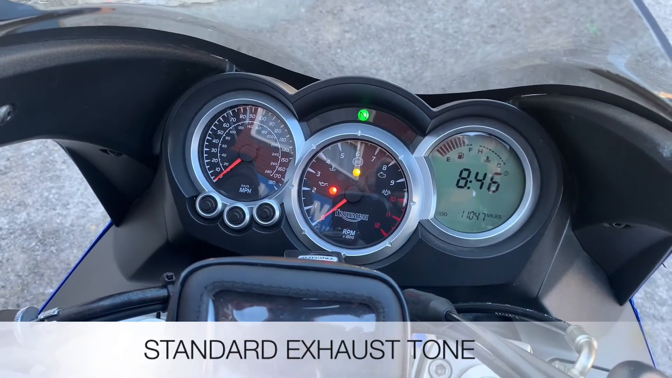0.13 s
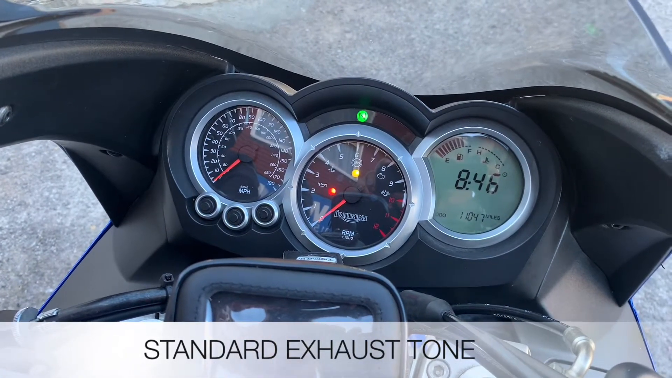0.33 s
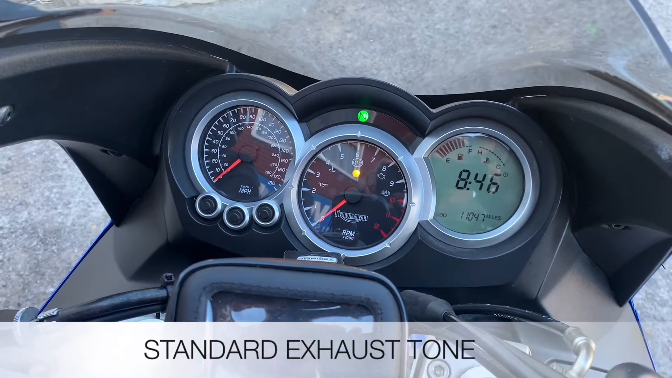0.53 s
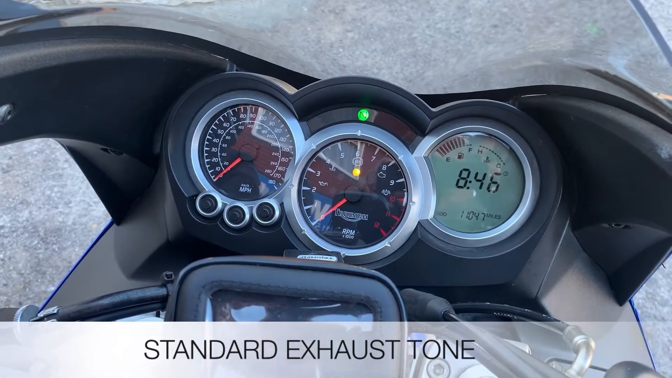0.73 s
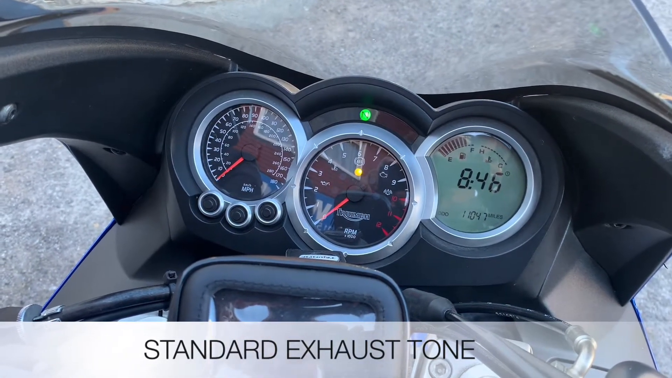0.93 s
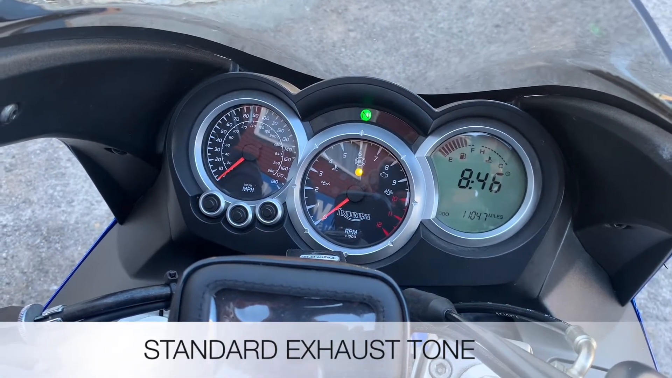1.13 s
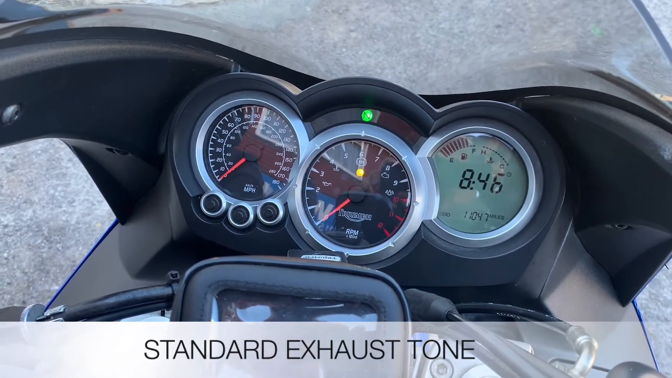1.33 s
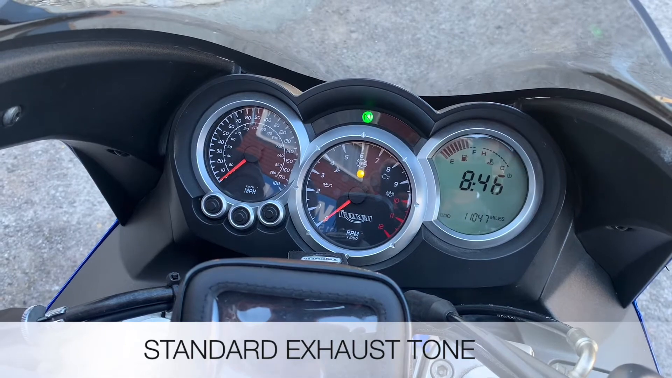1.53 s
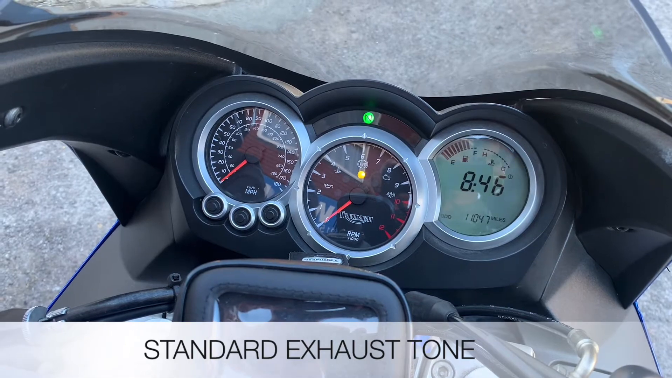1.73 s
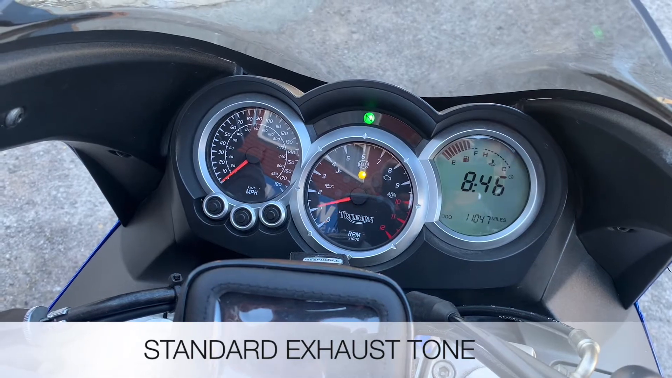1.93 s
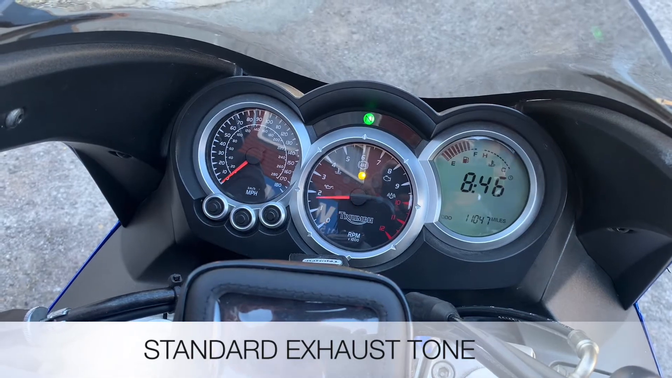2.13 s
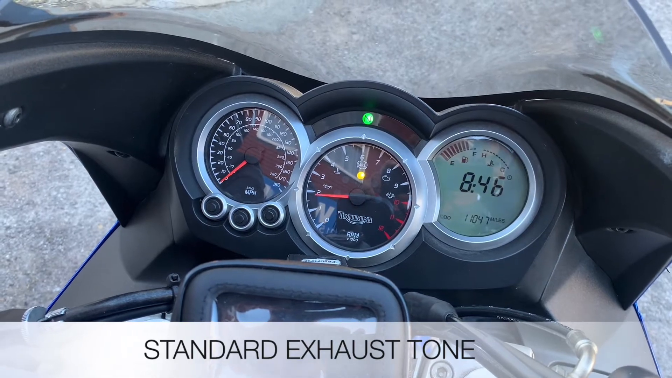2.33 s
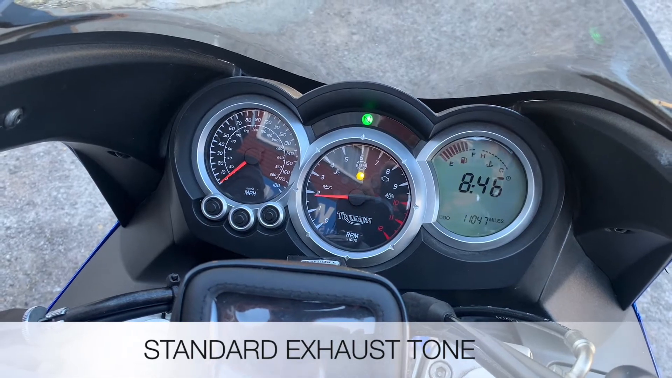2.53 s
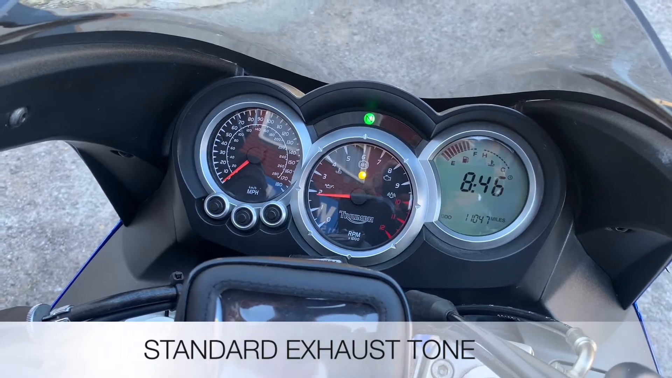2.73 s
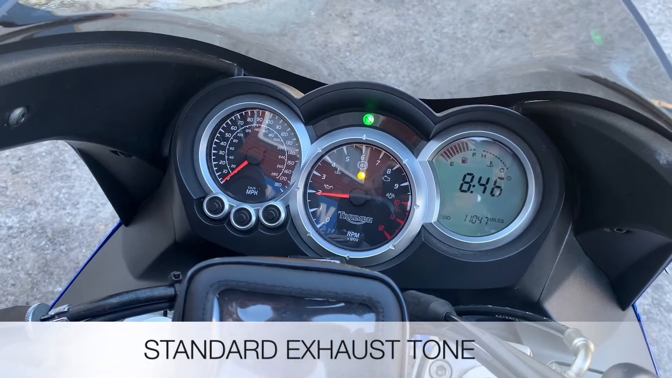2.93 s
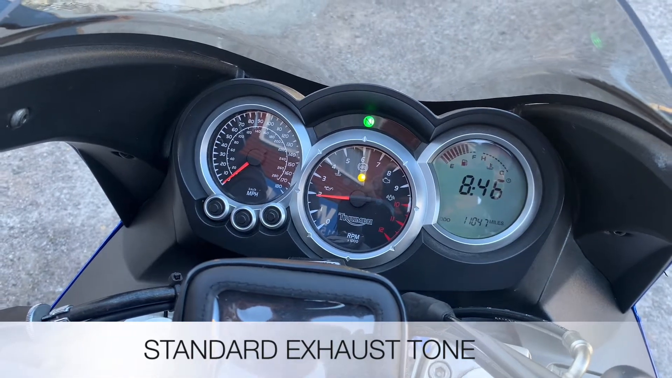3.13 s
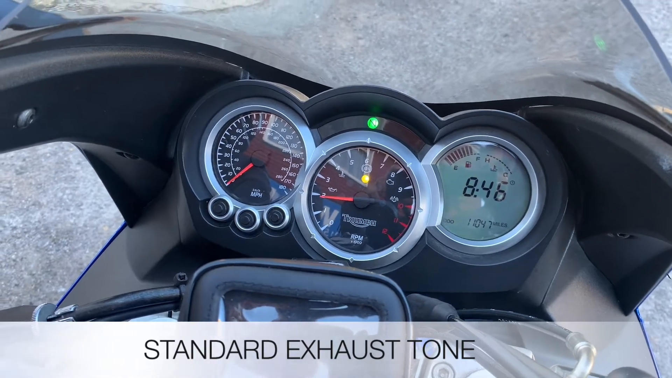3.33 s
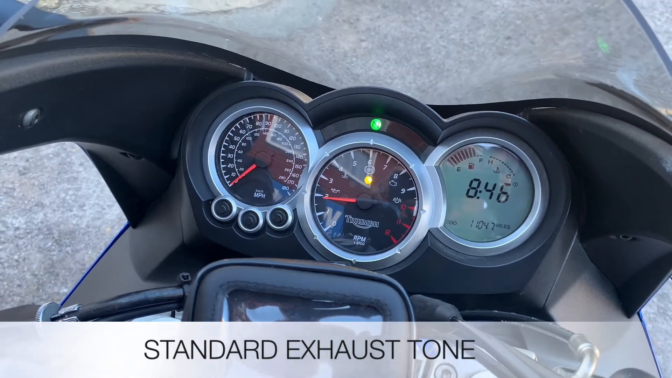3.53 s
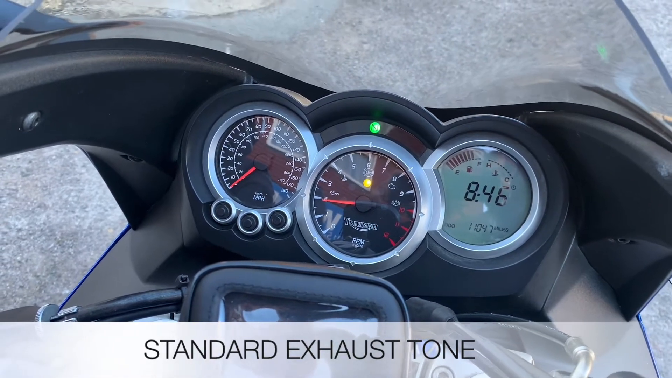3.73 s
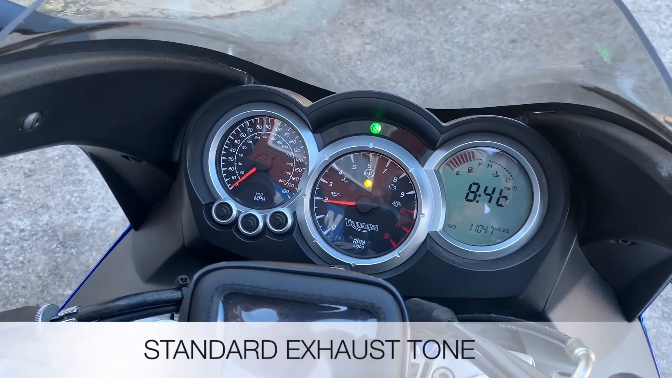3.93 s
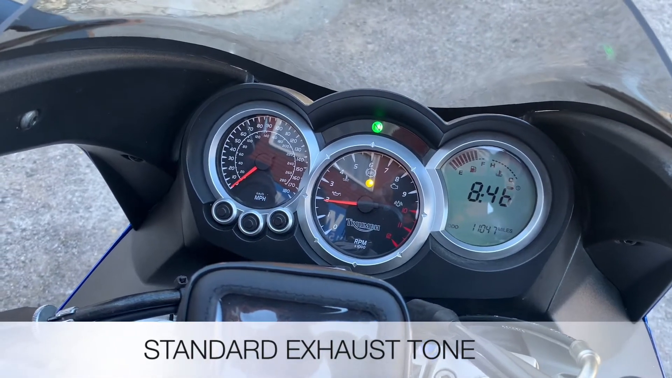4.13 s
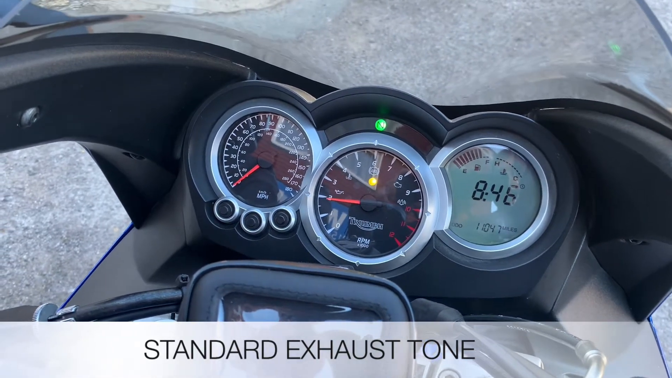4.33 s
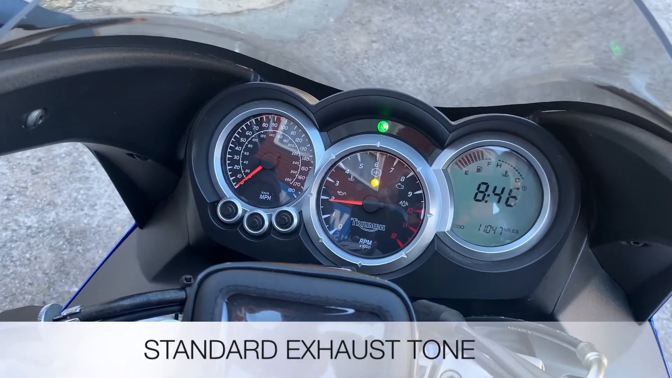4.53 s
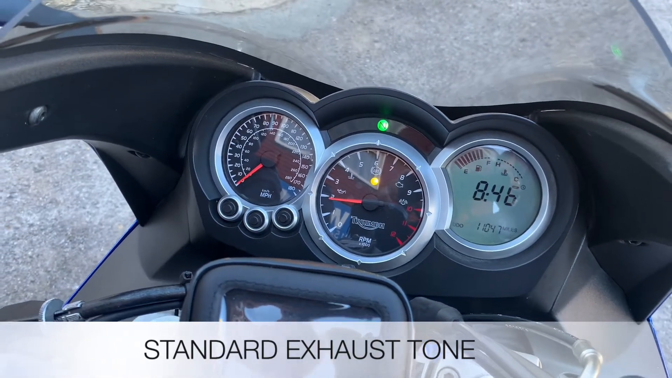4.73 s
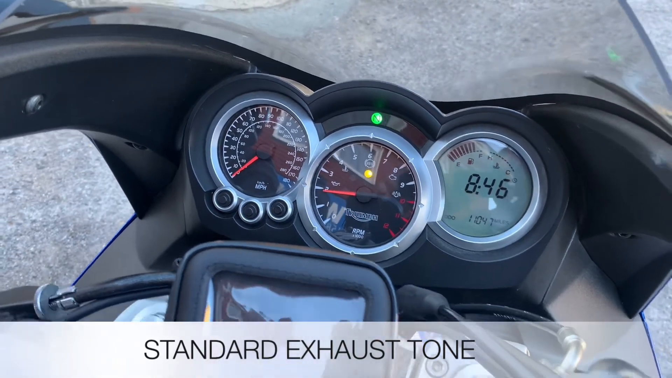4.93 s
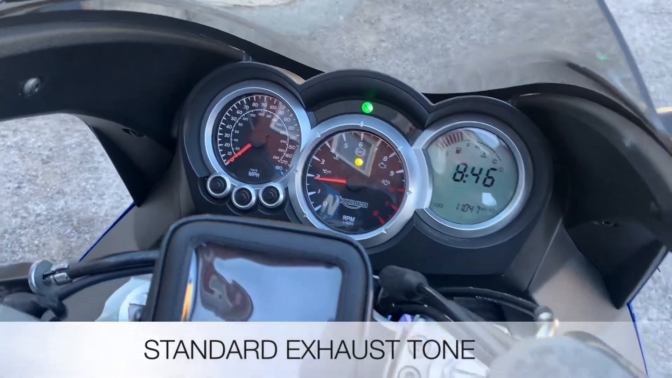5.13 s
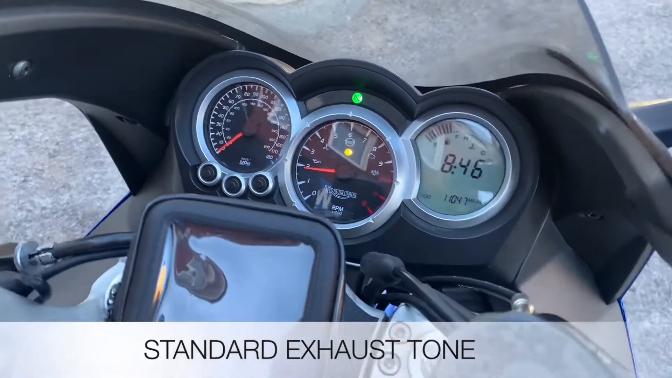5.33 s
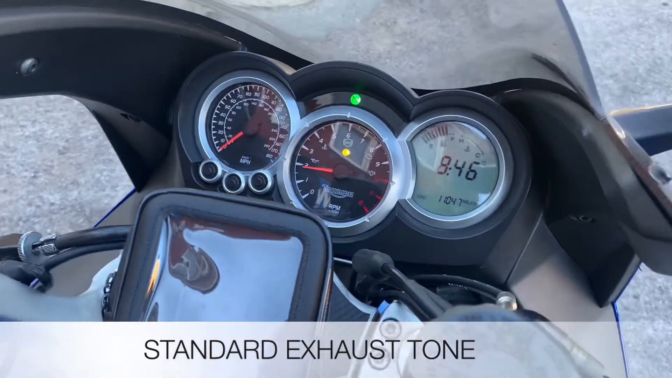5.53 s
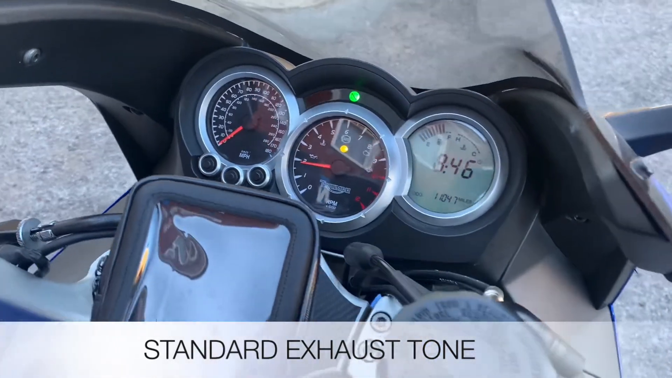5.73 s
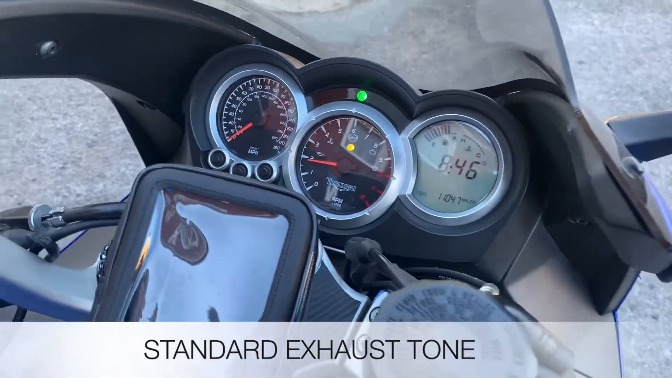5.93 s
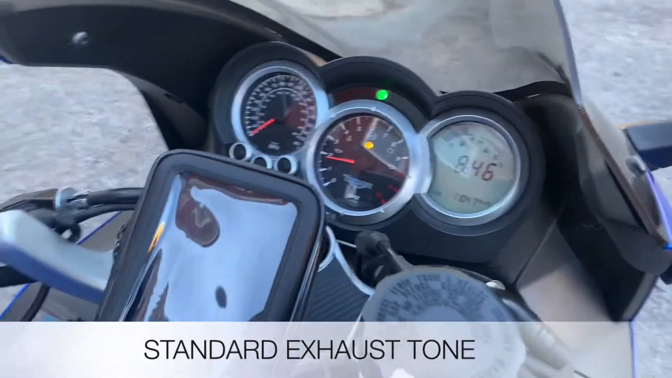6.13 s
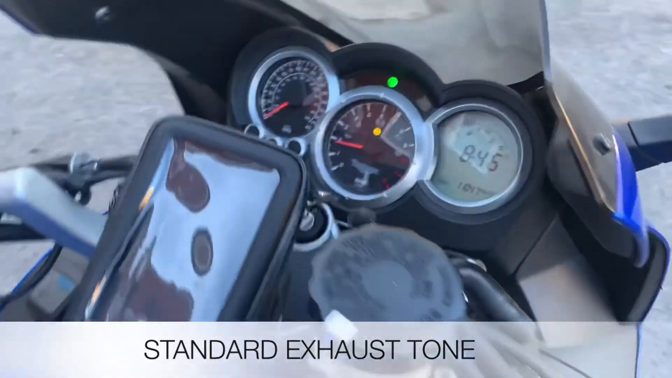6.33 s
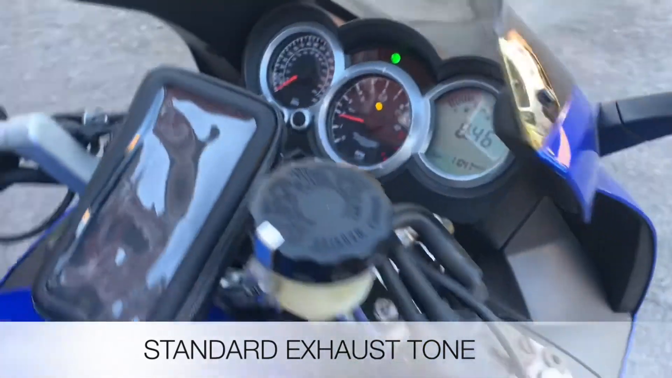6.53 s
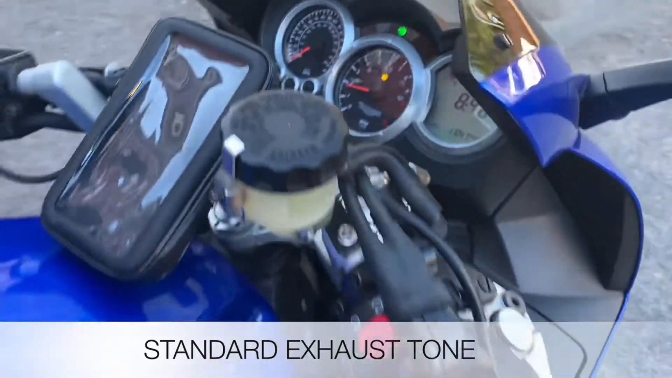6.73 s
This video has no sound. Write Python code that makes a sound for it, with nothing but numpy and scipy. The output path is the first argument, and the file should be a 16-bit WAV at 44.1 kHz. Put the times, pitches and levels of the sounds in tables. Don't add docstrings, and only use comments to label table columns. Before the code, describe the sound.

Outdoors, close above a motorcycle's tank, in stereo through a small microphone with thin deep bass. From 0 to about 1.5 s the starter drags the engine over: hard, ringing metallic slams roughly every 0.15 s, each with a double-bouncing gear rattle, low thud and airy whoosh, preceded by a short squeak. A rough motor hum and drone labours beneath. At 1.55 s the three-cylinder engine catches with a brief booming bark, surges and climbs in pitch until about 2.1 s as the starter drops out. From 2.5 to 5.5 s it holds a brisk, slightly wavering idle: even low exhaust throb, pulsing gear whine, dry clatter, dull knocking and light valve ticks. From 5.5 s the listener moves towards the silencer; the exhaust grows louder and rougher, whine and clatter recede a little, speed sags slightly, sharper ticks poke through, and the engine is still running at 6.9 s.

```python
import sys
import numpy as np
from scipy import signal
from scipy.fft import rfft, irfft, next_fast_len
from scipy.io import wavfile
from scipy.ndimage import uniform_filter1d, map_coordinates

SR = 44100
rng = np.random.default_rng(int(sys.argv[2]) if len(sys.argv) > 2 else 0)


def field_ratio(decibels):
    return 10 ** (np.asarray(decibels, dtype=float) / 20)


def wav_record(signal):
    frames = np.transpose(np.atleast_2d(signal))
    bounded = np.clip(frames, -1, 1)
    quanta = np.round(bounded * 32767).astype(np.int16)
    wavfile.write(sys.argv[1], SR, quanta)


N = 302967
TIME = np.arange(N) / SR

# time in seconds, speed in rev per minute.
CRANK_SPEED = [(1.54, 1234.7), (1.76, 1386.9), (1.84, 1767.2), (2.12, 1867.6), (2.44, 1761.4),
               (2.74, 1940.8), (2.94, 1861.8), (3.34, 1842.2), (3.42, 1889.0), (4.44, 1857.0),
               (4.48, 1788.2), (4.72, 1852.7), (4.98, 1781.5), (5.26, 1841.1), (5.54, 1814.0),
               (5.92, 1699.0), (6.26, 1738.1), (6.87, 1641.4)]
# time in seconds, level in dB over the settled idle.
EFFORT = [
    (1.54, -1.5),
    (1.66, 7),
    (1.72, 3),
    (1.79, 5),
    (1.9, 4),
    (2.35, 2.7),
    (2.6, 3.5),
    (3.1, 1.5),
    (3.6, 2),
]
# time in seconds, nearness to the silencer from 0 to 1.
WALK = [
    (3.2, 0),
    (5.2, 0.05),
    (5.5, 0),
    (5.75, 0.55),
    (6, 0.67),
    (6.87, 0.88),
]
# time in seconds, level in dB over the tones, width in seconds.
PIPE_BOOMS = [
    (1.545, 2, 0.024),
    (1.72, 1, 0.039),
]
# multiple of the two-turn cycle, dB above the tank, dB near the silencer.
FIRING_TONES = [(3, -6.5, -20.5), (6, 1, -2), (9, 0.5, -4.5), (12, -11.5, -2.5), (15, -3.5, -5.5),
                (18, -11, -12.5), (21, -16.5, -5), (24, -15, -18), (27, -14, -8.5), (30, -33.5, -27),
                (33, -26.5, -24.5)]
# multiple of the two-turn cycle, level in dB.
UNEVEN_TANK = [(2, -44), (4, -10.5), (5, -12), (7.5, -48), (10, -8), (14, -8), (17, -22.5), (34, -24.5)]
# multiple of the two-turn cycle, level in dB.
UNEVEN_SILENCER = [(2, -33), (4, -8), (7, -53), (10, -22.5), (34, -20.5)]
# frequency in Hz, density in dB per Hz.
GAS_PUFF = [(21, -46), (35, -11), (103, -3), (227, -1.5), (641, -9), (700, -61), (910, -53), (1540, -120)]
# multiple of the two-turn cycle, level in dB, first load-up in the cycle from 0 to 1,
# change near the silencer in dB.
GEAR_MESHES = [(93.1, -2.5, 0.21, -6), (119.17, -1.5, 0.51, -5), (123.3, -15, 0.42, 13.5),
               (164, -23.5, 0.24, 13.5), (178.8, -6.5, 0, -2), (186.4, -12.5, 0.16, -2),
               (239.4, -19, 0.08, 9), (280.6, -18.5, 0.12, 3.5)]
# frequency in Hz, gain in dB.
FAIRING = [(1250, -2), (1450, -1), (1650, 1.5), (1830, -1.5), (1990, 2), (2600, -7), (5000, 0)]
# frequency in Hz, density in dB per Hz.
CLATTER = [(1500, -52), (2300, 0), (3400, 2), (4370, -3.5), (5600, -8.5), (7050, -10.5), (9190, -11.5),
           (10700, -15.5), (11000, -6), (12100, -37), (12800, -14), (15000, -23), (15700, -30),
           (16200, -100)]
# frequency in Hz, density in dB per Hz.
BLOCK_KNOCK = [(250, -6.5), (400, -1), (600, -11), (740, -9.5), (950, -7), (1350, -3.5), (1670, -1.5),
               (1950, -5), (2200, -11.5), (2800, -42), (4000, -107)]
# frequency in Hz, level in dB.
PANELS = [(645, -39.5), (1040, -44.5), (1157, -37.5), (1275, -37)]
# frequency in Hz, density in dB per Hz.
VALVE_TICK = [(3000, -40), (8000, -9), (9300, 1), (10600, -1.5), (11500, -1), (13000, 2), (14200, -5),
              (16200, -18)]
# place in the cycle from 0 to 1, level in dB.
VALVE_SEATS = [
    (.32, -29.5),
    (.655, -34.5),
    (.0, -42),
]
# time in seconds, peak in dB.
HARD_TICKS = [(1.6265, -44), (1.8455, -40), (2.2392, -39), (2.309, -42), (2.3723, -39), (3.0169, -38),
              (3.7876, -48), (4.1718, -42), (4.5634, -41), (5.5521, -36), (5.6848, -34), (5.7532, -41),
              (5.8235, -39), (5.8923, -36), (6.1732, -39), (6.4516, -40), (6.5249, -37), (6.7369, -39)]
# time in seconds, slam peak in dB, air rush in dB.
STROKES = [(0.0, -20.5, -48), (0.098, -8.5, -27), (0.247, -9, -24), (0.406, -9.5, -26), (0.555, -9, -25),
           (0.699, -9, -27), (0.851, -8.5, -24), (0.996, -9, -25.5), (1.142, -9, -24.5),
           (1.292, -8.5, -27.5), (1.437, -9, -25)]
# frequency in Hz, density in dB per Hz.
FRAME_THUD = [(30, -30), (70, 2), (150, -1), (260, -10), (500, -40)]
# frequency in Hz, width in Hz, level in dB.
CASE_MODES = [(807, 78, -3.5), (904, 45, 1.5), (978, 19.7, 5), (1048, 84, -3), (1266, 25, -6),
              (1476, 99, -6), (1760, 73, -4), (1924, 101, -4), (2250, 27, -9.5), (2453, 143, -10),
              (2750, 23, -10), (2960, 126, -14.5)]
# frequency in Hz, density in dB per Hz.
AIR_RUSH = [(1500, -30), (3000, -4), (5000, 3), (7000, 5), (9000, 4), (10700, -49), (11000, -62),
            (12100, -60), (12600, -23), (15700, -28), (16200, -90)]
# frequency in Hz, level in dB, loudest place in a stroke from 0 to 1,
# speed swing from 0 to 1.
ARMATURE_TONES = [(59, -35, 0.08, 0.23), (313.5, -45, 0.21, 0.03), (428.5, -47.5, 0.98, 0.04),
                  (568, -48, 0.81, .05), (1740, -46, 1, .08)]
# frequency in Hz, density in dB per Hz.
MOTOR_DRONE = [(18, -30), (30, -9), (308, -3.5), (675, -9.5), (1000, -6), (1200, -11), (1920, -12),
               (4000, -25), (8550, -33.5), (10300, -35), (11700, -52), (13300, -44), (15600, -71)]
# frequency in Hz, likeness from 0 to 1.
LIKENESS = [(60, .99), (350, .98), (700, .88), (1400, .76), (2800, .56), (5500, .52), (9000, .84),
            (15000, .84)]
# frequency in Hz, lead of the left in radians.
LEFT_LEAD = [(0, 0), (950, 1.1), (1720, -1.0), (3530, 3.1), (4220, -0.2), (4910, -0.7), (7240, -3.3),
             (8700, -6.0), (10200, -6.9), (11100, -9.4), (12300, -9.6), (13300, -12.5), (15000, -12.7),
             (15300, -15.6)]
# frequency in Hz, left minus right in dB.
LEFT_TILT = [(60, -.6), (250, .5), (450, .3), (700, -2.7), (1400, -.5), (2800, -1.4), (5600, -2.7),
             (9000, .1), (15000, 0)]
# frequency in Hz, gain in dB.
TREBLE_DIPS = [(10700, 0), (11100, -8), (12000, -8), (12400, 0), (15100, 0), (15400, -12)]


def unit(x):
    return x / np.sqrt(np.mean(x ** 2) + 1e-20)


def along(points, hz):
    f, v = np.transpose(points)
    return np.interp(np.log(hz + 1), np.log(f + 1), v)


def curve(rows):
    return np.interp(TIME, *np.transpose(rows))


def wobble(rate):
    return map_coordinates(rng.standard_normal(int(N * 400 / SR)), [TIME * min(rate, 390)])


def filtered(x, response):
    m = next_fast_len(N + 8192)
    return irfft(rfft(x, m) * response(np.fft.rfftfreq(m, 1 / SR)), m)[..., :N]


def hiss(spectrum, grain=1):
    return unit(filtered(grain * rng.standard_normal(N), lambda hz: field_ratio(along(spectrum, hz))))


def patchy(x, depth_db):
    z = signal.stft(x, nperseg=512)[2]
    field = uniform_filter1d(rng.standard_normal(z.shape), size=3, axis=0)
    field = uniform_filter1d(field, size=4, axis=1)
    return unit(signal.istft(z * field_ratio(depth_db * unit(field)), nperseg=512)[1][:N])


def blows(times, sizes, rise, t60):
    age = TIME[None] - np.asarray(times)[:, None]
    attack = np.clip(1 + age / rise, 0, 1) ** 2
    return np.asarray(sizes) @ (attack * field_ratio(-60 * np.clip(age, 0, 1) / t60))


def cycle():
    firing = TIME >= CRANK_SPEED[0][0]
    return 0.7947 + np.cumsum(curve(CRANK_SPEED) * firing) / 120 / SR


def controls():
    effort_db, walk = curve(EFFORT), curve(WALK)
    since = np.clip(TIME - CRANK_SPEED[0][0], 0, None)
    octaves = np.log2(curve(CRANK_SPEED) / 1800)
    near = np.clip(walk + 0.34 * np.exp(-since / 0.1), 0, 1)
    boom = field_ratio(-14)
    for s, db, width in PIPE_BOOMS:
        boom = boom + field_ratio(db) * np.exp(-.5 * ((TIME - s) / width) ** 2)
    take_up_s = 0.076
    whine = field_ratio(-22 + 12.5 * octaves) * np.clip(since / take_up_s, 0, 1) ** 2
    clatter = field_ratio(-32.5 + 4.5 * octaves)
    pipe = field_ratio(-24 + effort_db + 6 * walk)
    return pipe, whine, clatter, near, 20 * np.log10(boom)


def firing_tones(turns, near):
    between = []
    for k in range(1, 35):
        if k % 3:
            tank_db = np.interp(k, *np.transpose(UNEVEN_TANK))
            between.append((k, tank_db, np.interp(k, *np.transpose(UNEVEN_SILENCER))))
    tones = np.zeros(N)
    for order, tank_db, near_db in FIRING_TONES + between:
        order = round(order)
        place, lean, rough = (.452, -.1, .2) if order % 3 else (.206, 2.0, .07)
        angle = 2 * np.pi * order * (turns - place) + lean + rough * np.sqrt(order / 6) * wobble(7)
        level_db = tank_db + near * (near_db - tank_db) + 13.3 * rough * wobble(6)
        tones += field_ratio(level_db) * np.cos(angle)
    return unit(tones)


def pipe_boom(turns, boom_db):
    swing = 12 * np.pi * (turns - .206) + 2.0
    boom = np.zeros(N)
    for k, db in enumerate([0, -9, -16], start=1):
        boom += field_ratio(db + 3.2 * wobble(20)) * np.cos(k * swing + 0.35 * wobble(15))
    return field_ratio(boom_db) * boom


def exhaust(turns, near, boom_db):
    puff = hiss(GAS_PUFF, field_ratio(4.3 * np.cos(6 * np.pi * (turns - .22))))
    puff_db = -12 - 5 * near - .3 * np.clip(boom_db, 0, 20)
    return firing_tones(turns, near) + field_ratio(puff_db) * puff + pipe_boom(turns, boom_db)


def gears(turns, near):
    off = 1860 - curve(CRANK_SPEED)
    pull = .42 * off * np.exp(-(off / 400) ** 2)
    drawn = turns + np.cumsum(pull) / 120 / SR
    angle = drawn + .0014 * np.sin(6 * np.pi * (turns - .01)) + .0003 * wobble(30)
    whine = np.zeros(N)
    for order, db, first, near_db in GEAR_MESHES:
        load = field_ratio(-20.5)
        for place in (first, first + 0.565):
            load = load + field_ratio(-64 * ((turns - place) % 1))
        load = uniform_filter1d(load, size=300) * field_ratio(2 * wobble(60))
        whine += field_ratio(db + near * near_db) * load * np.sin(2 * np.pi * order * angle + .35 * wobble(70))
    return unit(filtered(whine, lambda hz: field_ratio(along(FAIRING, hz))))


def clatter_and_knock(turns, near):
    beat = np.cos(4 * np.pi * (turns - .15))
    clatter = patchy(hiss(CLATTER, field_ratio(1.6 * wobble(350) + 0.76 * beat)), depth_db=1.5)
    knock = hiss(BLOCK_KNOCK, field_ratio(1.17 * wobble(200) + 0.52 * beat))
    return clatter + field_ratio(5 - 0.5 * near) * knock


def panels():
    song = np.zeros(N)
    for hz, db in PANELS:
        song += field_ratio(db + 2.5 * wobble(12)) * np.sin(2 * np.pi * hz * TIME + 1.63 * wobble(22))
    return song


def valves(turns):
    hits = np.zeros(N)
    for place, db in VALVE_SEATS:
        at = np.flatnonzero(np.diff(np.floor(turns - place)))
        hits[at] = field_ratio(db + 3 * rng.standard_normal(len(at)))
    for s, db in HARD_TICKS:
        hits[round(s * SR)] = field_ratio(db + 8)
    decay = field_ratio(-60 * TIME[:SR // 20] / .04)
    ring = signal.fftconvolve(hits, decay)[:N] * rng.standard_normal(N)
    return field_ratio(3) * filtered(ring, lambda hz: field_ratio(along(VALVE_TICK, hz)))


def engine():
    pipe, whine, rattle, near, boom_db = controls()
    turns = cycle()
    running = np.clip((TIME - 1.546) / 0.0056, 0, 1)
    throb = pipe * exhaust(turns, near, boom_db)
    singing = gears(turns, near) + field_ratio(23.0 - 3.6 * near) * panels()
    block = field_ratio(-1.5) * whine * singing + field_ratio(1.0) * rattle * clatter_and_knock(turns, near)
    return running * (throb + block) + valves(turns)


def case_response(f):
    total = 0
    for k, (centre, width, db) in enumerate(CASE_MODES):
        damping = 1j * f * width
        total = total + (-1) ** k * field_ratio(db) * damping / (centre ** 2 - f ** 2 + damping)
    return total


def gear_slam(s, db):
    slam = blows(s + .002, field_ratio(db - 2), .008, .2) + blows(s + .04, field_ratio(db - 13), .03, .4)
    teeth = field_ratio(2.2 * wobble(120)) * rng.standard_normal(N)
    scale = np.std(filtered(teeth, case_response))
    rattle = field_ratio(-9.5) * filtered(slam * teeth, case_response) / scale
    knocks = np.zeros(N)
    # delay in seconds, change in dB.
    for late, change_db in [(-.004, -6), (.001, 6.5), (.0135, 8.5), (.024, -2)]:
        knocks[np.round((s + late) * SR).astype(int)] = field_ratio(db + change_db)
    knocks = np.convolve(knocks, np.hanning(16) / 8, "same")
    return rattle + field_ratio(28.0) * filtered(knocks, case_response)


def frame_thud(s, db):
    return blows(s + .008, field_ratio(db - 26.5), 0.015, 0.23) * hiss(FRAME_THUD)


def air_rush(s, db, rush_db):
    return blows(s, field_ratio(db + rush_db - 6), .008, .3) * hiss(AIR_RUSH, field_ratio(2 * wobble(300)))


def belt_of_squeaks(s):
    at = np.append(s[1:], 1.58) - 0.051
    size_db = -26.5 - 3 * at
    envelope = blows(at + 0.003, field_ratio(size_db + 4), 0.017, 0.068)
    return envelope * np.sin(2 * np.pi * 1680 * TIME + 2.5 * wobble(60))


def motor_hum(s):
    stroke = np.interp(TIME, np.append(s, 1.6), np.arange(len(s) + 1))
    lurch = 0.144 / (2 * np.pi) * np.sin(2 * np.pi * (stroke + 0.072))
    hum = np.zeros(N)
    for k, (hz, level_db, loudest, swing) in enumerate(ARMATURE_TONES):
        swell_db, throbs = (4.5, 2) if k == 0 else (9, 1)
        swell = swell_db * np.cos(2 * np.pi * throbs * (stroke - loudest))
        angle = 2 * np.pi * hz * (TIME + swing * lurch) + .5 * wobble(30.17)
        hum += field_ratio(level_db + swell + 2.2 * wobble(24.6)) * np.sin(angle)
    return hum


def motor_drone():
    drone = patchy(hiss(MOTOR_DRONE, field_ratio(0.34 * wobble(230))), depth_db=2.0)
    return field_ratio(-35 + 3.4 * wobble(30.12)) * drone


def starter():
    s, db, rush_db = np.transpose(STROKES)
    engaged = np.clip((1.6 - TIME) / 0.085, 0, 1)
    impacts = gear_slam(s, db) + frame_thud(s, db) + air_rush(s, db, rush_db)
    motor = belt_of_squeaks(s) + motor_hum(s) + motor_drone()
    return engaged * (impacts + motor)


def ports(x):
    z = signal.stft(x, nperseg=512)[2]
    drift = np.cumsum(.9 * rng.standard_normal(z.shape), axis=1)
    stray = signal.istft(z * np.exp(1j * drift), nperseg=512)[1][:N]

    def turn(hz):
        return np.arccos(along(LIKENESS, hz)) / 2

    def skew(hz):
        lead = np.interp(hz, *np.transpose(LEFT_LEAD))
        return field_ratio((along(LEFT_TILT, hz) - 0.5) / 2) * np.exp(.5j * lead)

    common = filtered(x, lambda hz: np.cos(turn(hz)) * [skew(hz), 1 / skew(hz)])
    return common + filtered(1.4 * stray, lambda hz: np.sin(turn(hz)) * [skew(hz), -1 / skew(hz)])


def scene():
    return ports(engine()) + ports(starter())


def band_limit(x):
    return signal.sosfilt(signal.butter(12, 15750, fs=SR, output="sos"), x)


def record(dry):
    x = filtered(dry, lambda hz: 1 / (1 + (36 / (hz + 1)) ** 8) * (hz < 15780))
    mix = filtered(x, lambda hz: field_ratio(along(TREBLE_DIPS, hz)))
    return band_limit(mix)


dry = scene()
out = record(dry)
wav_record(out)
```